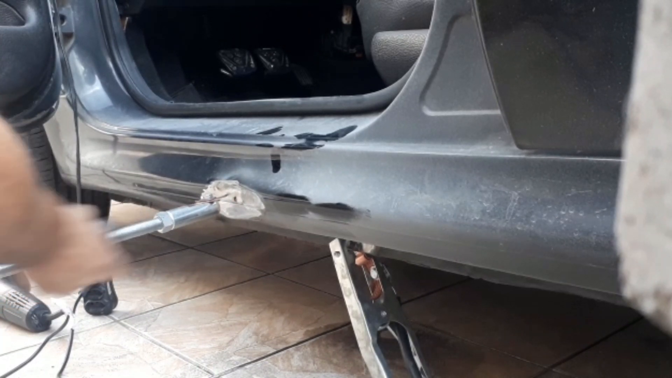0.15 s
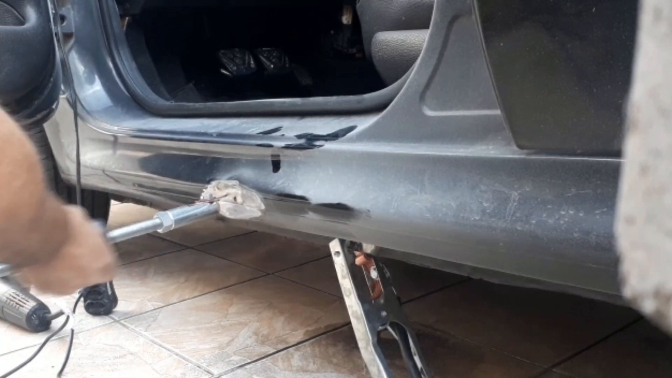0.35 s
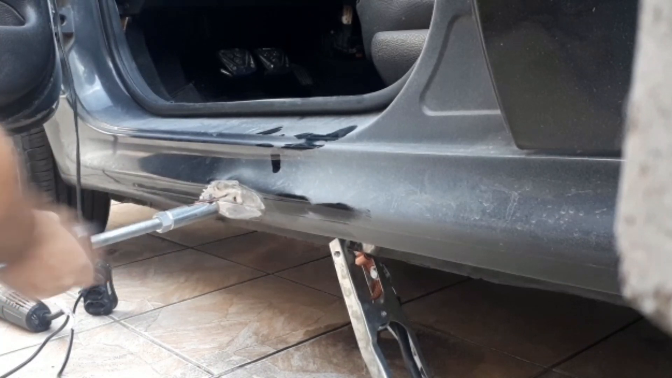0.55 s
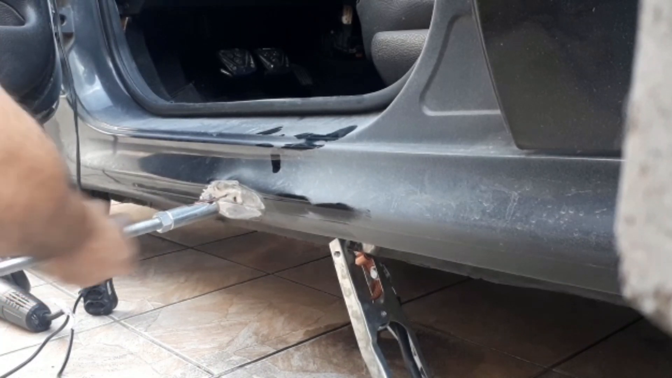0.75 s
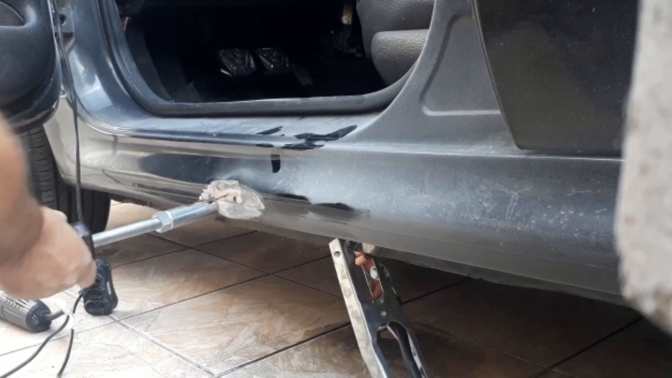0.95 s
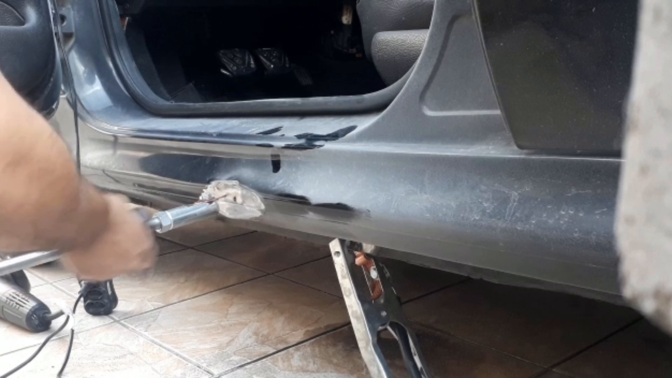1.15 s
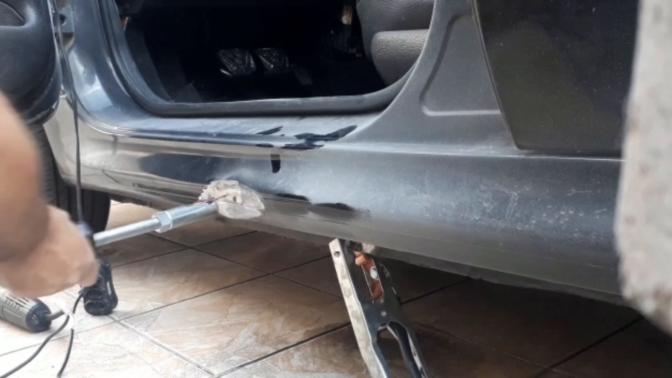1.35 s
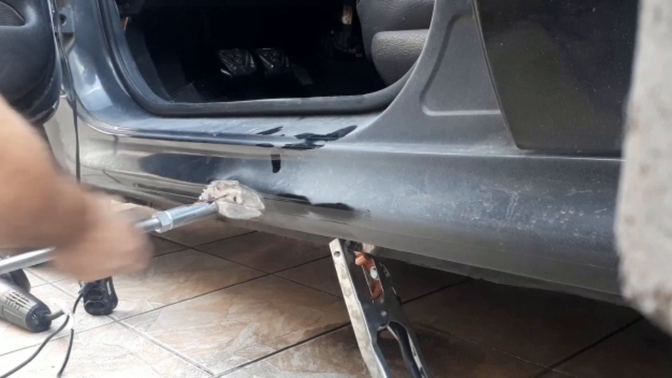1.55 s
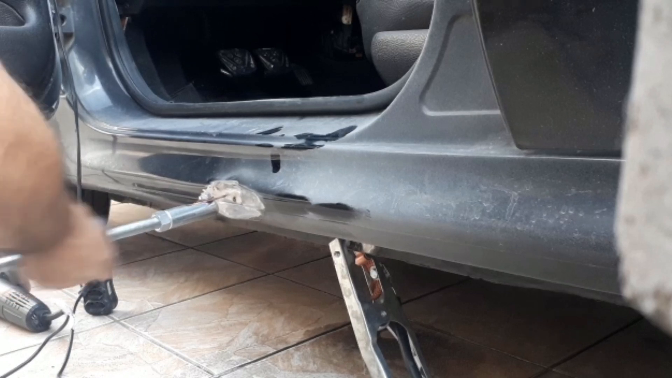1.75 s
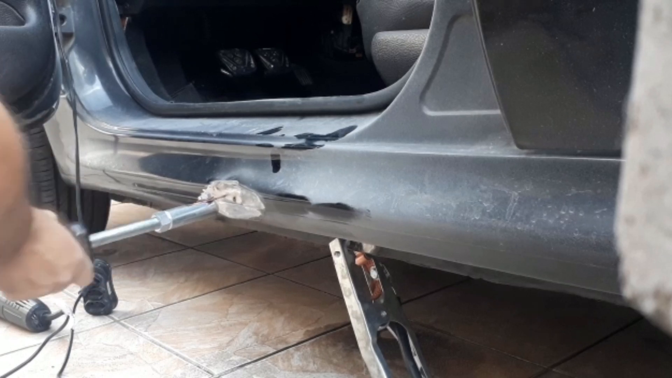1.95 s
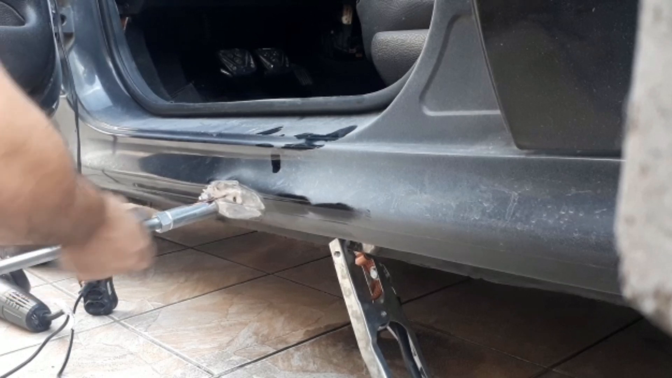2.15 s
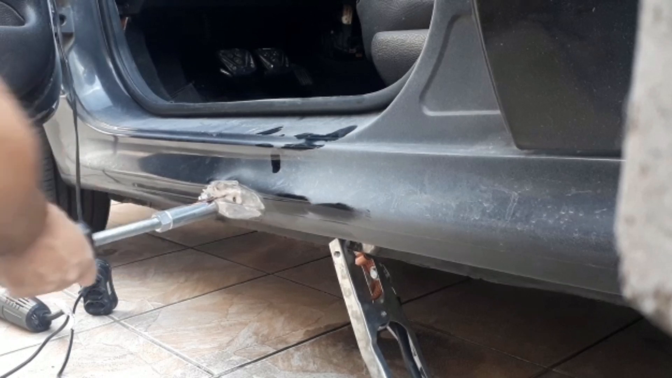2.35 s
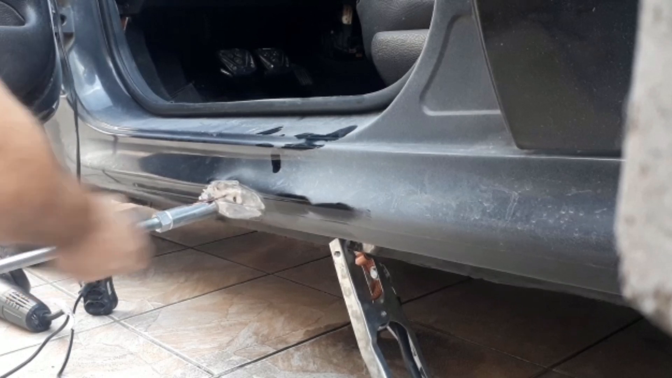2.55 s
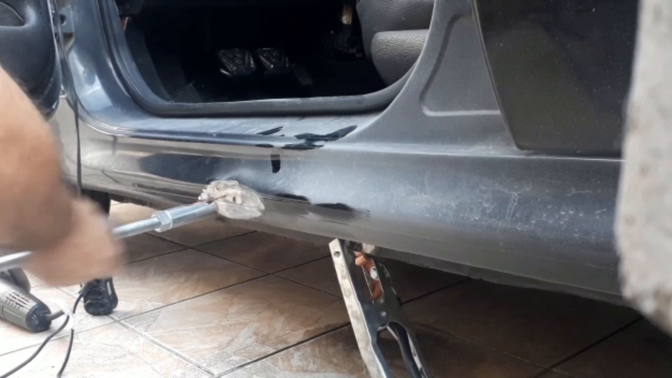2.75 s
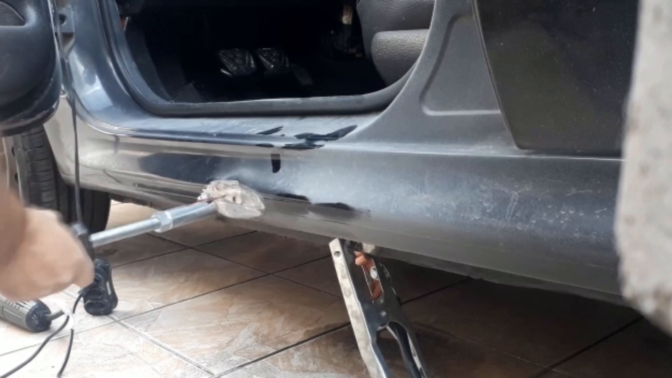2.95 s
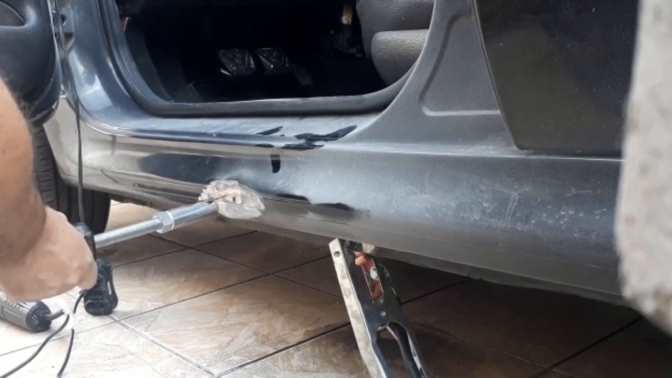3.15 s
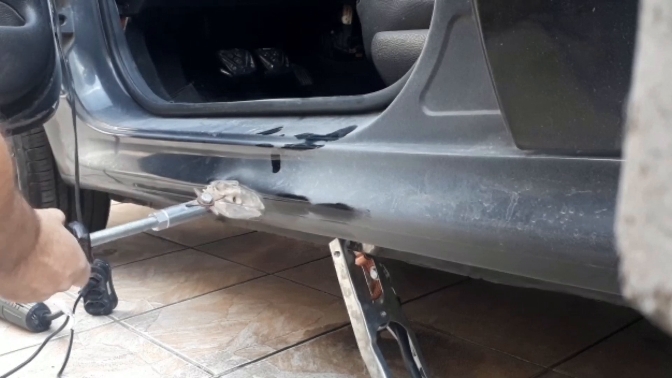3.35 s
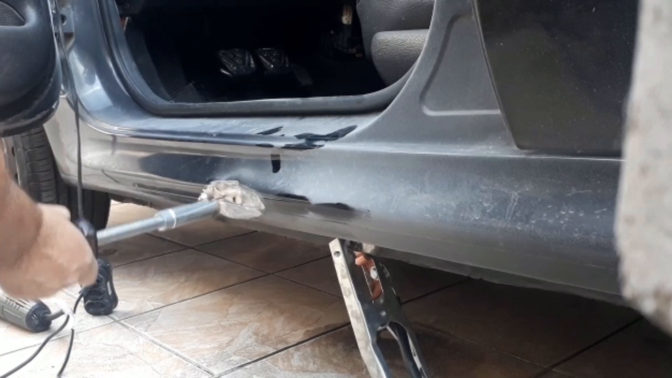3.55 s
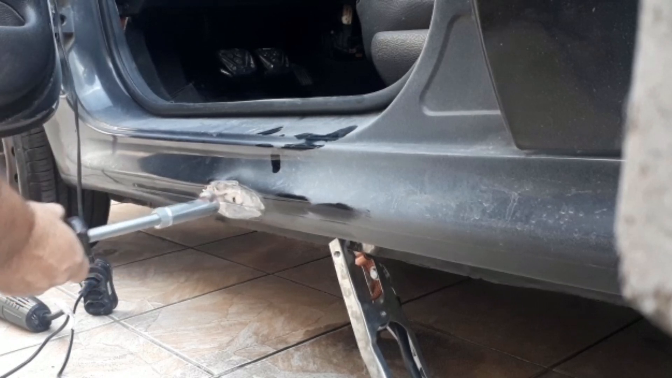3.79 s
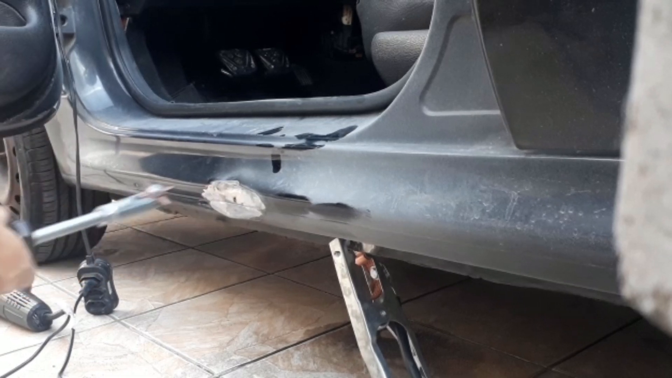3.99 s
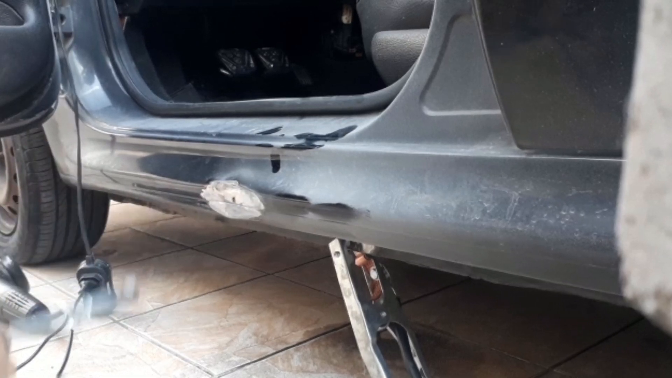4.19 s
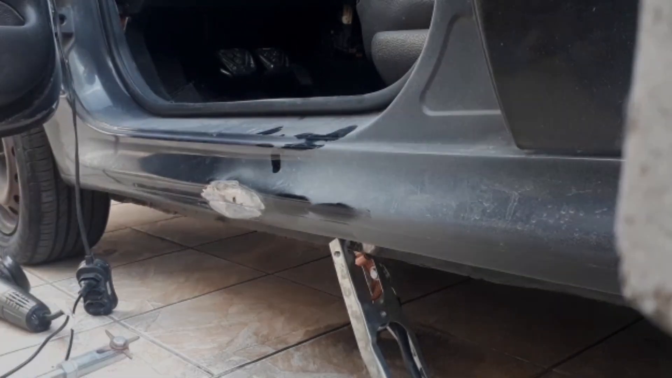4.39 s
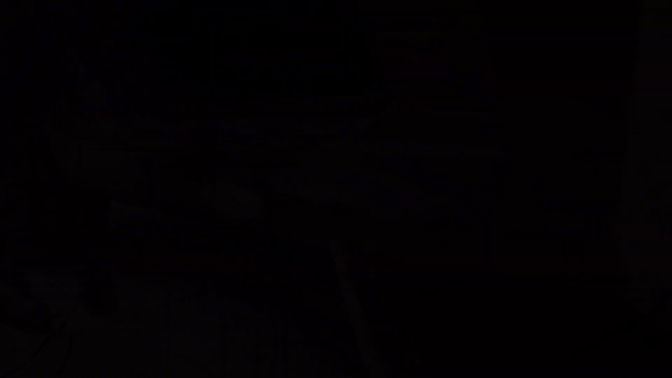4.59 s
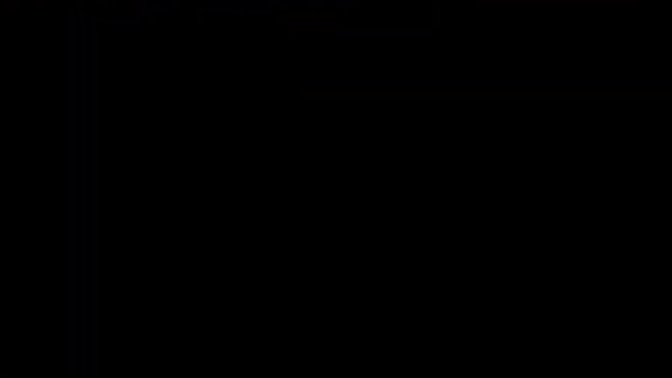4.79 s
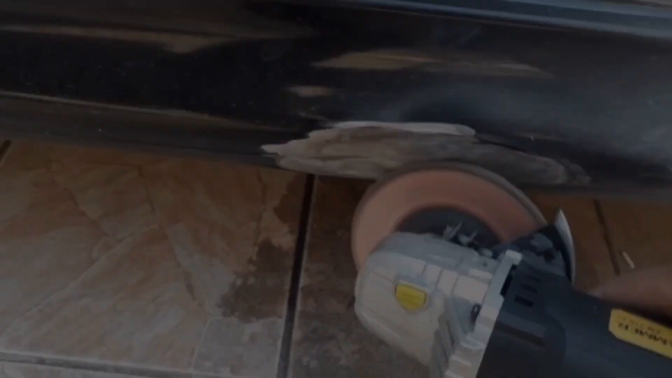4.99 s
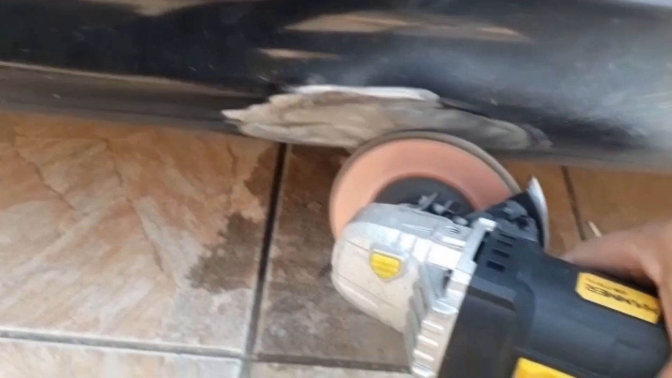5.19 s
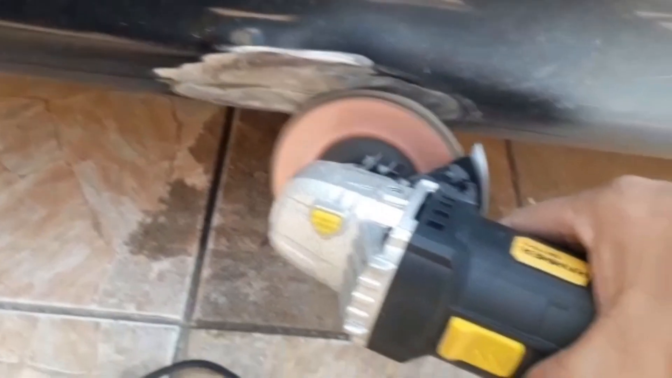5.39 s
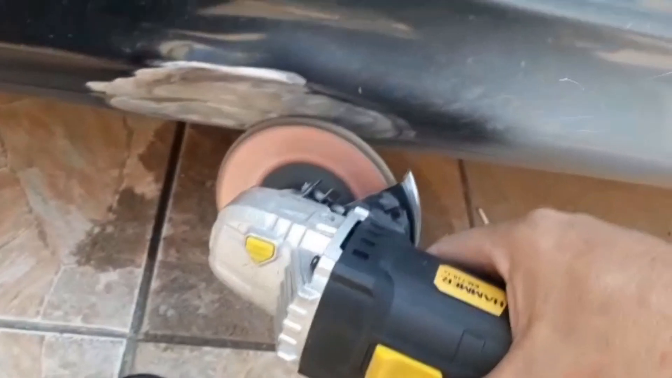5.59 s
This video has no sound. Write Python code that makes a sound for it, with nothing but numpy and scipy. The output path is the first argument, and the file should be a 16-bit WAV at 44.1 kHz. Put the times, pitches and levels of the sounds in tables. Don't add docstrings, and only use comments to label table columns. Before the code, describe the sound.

A slide hammer bangs nine times on a steel car sill with metallic scraping between, then knocks, brief silence, and an angle grinder fades in whining.

```python
import sys
import numpy as np
from scipy import signal
from scipy.io import wavfile

SR = 44100
rng = np.random.default_rng(int(sys.argv[2]) if len(sys.argv) > 2 else 0)


def ratio_of_db(decibels):
    return 10 ** (np.asarray(decibels, float) / 20)


def wav_out(sig):
    wavfile.write(sys.argv[1], SR, np.round(np.clip(np.atleast_2d(sig).T, -1, 1) * 32767).astype(np.int16))


N = 248283
TIME = np.arange(N) / SR

# (frequency [Hz], level [dB per Hz])
YARD_SPECTRUM = [(30, -27.5), (50, -16.5), (140, -4.5), (400, -12), (616, -6), (1300, -14.5), (2200, -27.5),
                 (16000, -43.5)]
BLOW_SPECTRUM = [(29, -60.5), (50, -26.5), (171, -2.5), (601, -1), (694, -5.5), (1210, -1), (1330, -20.5),
                 (1540, 1), (2880, -16), (4790, -18), (6090, -24), (8540, -29), (16000, -34)]
TAP_SPECTRUM = [(59, -37), (100, -16), (801, 5.5), (1550, 9.5), (2080, 1), (2420, 4.5), (3320, -50.5),
                (3940, -26), (7940, -13), (8640, -64.5), (9820, -48), (11900, -40), (16000, -53.5)]
KNOCK_SPECTRUM = [(59, -59), (100, -5), (328, -2.5), (1150, -5), (1720, -8), (1910, -1.5), (2270, -6.5),
                  (3250, -12.5), (3860, -8), (8640, -24.5), (16000, -44)]
FAN_SPECTRUM = [(24, -52), (70, -42), (167, -18), (444, -35), (510, 5), (585, -15), (646, 0), (1300, -1),
                (2050, 2.5), (3650, 3), (5180, -3), (6170, 1), (9690, -6), (12100, -6.5), (16000, -15)]

# (frequency [Hz], decay time T60 [s])
PANEL_T60 = [(50, 0.16), (130, 0.28), (400, 0.25), (1200, 0.24), (3000, 0.21), (7000, 0.15), (14000, 0.091)]
# (frequency [Hz], level [dB], decay time T60 [s])
SILL_MODES = [(62.4, -23.5, 0.27), (132.6, -20.5, 0.42), (218.2, -3, 0.3), (252.9, 3, 0.18),
              (296.7, 0.5, 0.16), (332.6, -3, 0.1), (374.8, -2.5, 0.23), (520, -12.5, 0.52),
              (611, -8, 0.35), (775, -3.5, 0.22), (889, -2.5, 0.083), (968, -9.5, 0.13), (1155, -9, 0.068),
              (1175, 4, 0.067), (1384, -4, 0.099), (1364, -7, 0.34), (1538, -3, 0.22), (1686, -12, 0.36),
              (2123, -2.5, 0.11)]
# (frequency [Hz], width [Hz], level [dB], decay time T60 [s])
ROD_CLUSTERS = [(1450, 160, -6, .12), (1690, 90, -8, .16), (2400, 220, -1, .08), (2750, 250, -5, .06),
                (3650, 110, -11, .2), (3950, 180, -8, .12), (4750, 200, -1, .12), (5250, 300, -5, .08),
                (8700, 330, -5, .17), (12000, 400, -20, .1)]
DRAG_DB = [3, 5, -1, -7, -8, -4, -18, -15, -21, -22]
# (frequency [Hz], level [dB], decay time T60 [s])
FREE_ROD_MODES = [(1470, -2, 0.066), (2285, 5, 0.039), (3570, -13, 0.15), (3750, -2.5, 0.094),
                  (4300, -21, .04), (5730, -7, .03), (7200, -14, .036), (8400, -12, .054)]
# (frequency [Hz], width [Hz])
HAMMER_DIPS = [(700, 70), (2050, 260)]
# (frequency [Hz], level [dB])
HUM_TONES = [(58.7, -74.5), (117.4, -67.5), (176, -68)]

# (time [s], peak [dB], brightness [dB],
# drag of the push that ends [dB], drag of the pull that starts [dB])
TURNS = [(0.087, -38, -22.5, -33, -38), (0.429, -13.5, -7.5, -30, -30.5), (0.792, -13, -10, -34, -39.5),
         (1.165, -13.5, -14, -32, -40), (1.489, -12.5, -.6, -31.5, -41.5), (1.83, -18, -28, -27.5, -38.5),
         (2.16, -14, -25, -28.5, -37.5), (2.481, -13, -2.5, -28.5, -30.5), (2.815, -15, -4, -34.5, -38.5)]
# (time [s], peak [dB], boom [dB], decay factor [1], clank [Hz])
BLOWS = [(0.197, -0.5, 4, 0.97, 2080), (0.568, -2, 6, 0.83, 2305), (0.918, -1.5, 4.5, 0.85, 2170),
         (1.285, -2.5, 4, 0.96, 2350), (1.623, -1, 1.5, 0.99, 2335), (1.957, -3, 3, 1, 2500),
         (2.291, -0.5, 1, 0.96, 2300), (2.624, -2.5, 2, 0.9, 2360), (2.951, -1, 3, 0.83, 2270)]
# (time [s], peak [dB], decay factor [1])
SLACKS = [(0.161, -20, 3.4), (0.542, -8, 2.3), (0.886, -11, 1.83), (1.254, -11, 2.37), (1.597, -10, 0.73),
          (1.929, -9.5, 1.1), (2.261, -11, 1.1), (2.59, -13, 2.1), (2.92, -13, 1.3)]
# (time [s], peak [dB], decay factor [1])
BOUNCES = [(0.28, -9.5, .6), (0.638, -11.5, .35), (0.989, -32.5, 1.5), (1.349, -17, .35), (1.691, -15, .4),
           (2.017, -13.5, .35), (2.358, -16, .49), (2.689, -26.5, .35)]
# (time [s], peak [dB], decay factor [1], brightness [dB])
RATTLES = [(0.7, -25, 2.5, -44), (0.861, -22.5, .41, -16), (1.22, -22.5, 2.2, -19.5),
           (1.561, -21, 1.01, -8.5), (1.579, -17, .35, -20), (2.22, -22, .77, -15.5),
           (2.518, -8, .97, -8.5), (2.879, -29.5, 2.9, -15.5)]
# (time [s], peak [dB], boom [dB], brightness [dB], clank [Hz])
KNOCKS = [
    (3.28, -33.5, 7, -57, 1453),
    (3.322, -25.5, 3.5, -66, 2310),
    (3.483, -18.5, 4, -28, 1710),
    (3.517, -56, 15, -36, 520),
    (3.581, -37.5, 13, -54, 1650),
    (3.734, -32, 8, -28, 1080),
    (3.753, -7, 3.5, -24, 1323),
    (3.812, -20.5, -5, 3.5, 3770),
    (3.841, -20.5, 14, -18, 770),
    (3.996, -22, -42, 6.5, 2220),
]
# (time [s], peak [dB])
CLINKS = [
    (3.322, -60),
    (3.483, -46.5),
    (3.812, -35),
    (3.995, -35),
]
# (time [s], frequency [Hz], level [dB], decay time T60 [s])
PATCH_RINGS = [
    (3.517, 520, -36.5, 0.19),
    (3.585, 630, -48, 0.3),
    (3.33, 1130, -41, 0.14),
]
# (time [s], frequency [Hz], level [dB])
SQUEAK = [
    (3.655, 4600, -75),
    (3.67, 4600, -69),
    (3.69, 4481, -56),
    (3.70, 3700, -56),
    (3.725, 3500, -56),
    (3.735, 3102, -59),
    (3.75, 2900, -70),
]
# (time [s], peak [dB], boom [dB], brightness [dB], decay factor [1], clank [Hz])
SET_DOWN = [
    (4.319, -17, -5.5, 2.5, 1.6, 2270),
]

# (time [s], armature order 12 [Hz], whine re hiss [dB])
LOAD = [
    (4.81, 6119, -15),
    (4.91, 6122, -15),
    (5.06, 6111, -13),
    (5.268, 6109, -7.5),
    (5.448, 6107, -6.5),
    (5.492, 6105, -23),
    (5.53, 6109, -20),
    (5.63, 6114, -21),
]
# (frequency [Hz], width [Hz], level [dB])
HOUSING = [(1300, 200, -12), (3050, 350, -11), (3630, 130, -8), (4100, 450, -8), (6300, 400, -12),
           (8850, 500, -8)]
# (multiple of rotation [1], level re hiss [dB])
ARMATURE = [(1, -21), (9, -36.5), (10, -21.5), (23, -16.5), (25, -28.5)]
# (multiple of rotation [1], level re hiss [dB])
SPINDLE = [(4, -27), (6, -29.5), (8, -28.5), (9, -22), (10, -24), (11, -23.5), (12, -46), (16, -32),
           (22, -17.5), (54, -17)]
# (time [s], peak [dB])
THUMPS = [
    (4.943, -30),
    (5.016, -26.5),
    (5.094, -20.5),
    (5.2, -38),
    (5.398, -23.5),
    (5.45, -22),
]

YARD_DB = -57
FADE_OUT_START_S, FADE_OUT_END_S, CUT_S = 4.213, 4.677, 4.662
FADE_IN_START_S, FADE_IN_END_S = 4.806, 5.23
PUSH_START_S, FASTEST_SHARE, SLOWING_DB, STILL_S = -0.032, 0.64, 4.5, 0.02
PULL_GAIN_DB, SETTLE_S, SETTLE_DB = 6, 0.14, -52
SCRAPE_DB, JOLT_DB, JOLT_S = -14, -34, 0.09
BULGE_S, BULGE_DB = 0.0107, 2.5
BLOW_BRIGHT_DB = 6
TURN_BOOM_DB, TURN_RING, TURN_HZ = 6.5, 0.63, 2430
SLACK_BOOM_DB, SLACK_BRIGHT_DB, SLACK_HZ = -1, -4, 2420
BOUNCE_BOOM_DB, BOUNCE_BRIGHT_DB, BOUNCE_HZ = 4, -1.5, 2300
RATTLE_BOOM_DB, RATTLE_HZ = 11, 2400
KNOCK_RING, HEAVY_RING = 0.75, 1.46
SPINDLE_HZ, HISS_DB, TREBLE_TILT_DB = 165.3, -21, 3.0
SECOND_FOLLOWS, SECOND_DB = 0.6, -2.5


def rms_one(x):
    return x / np.sqrt(np.mean(x ** 2) + 1e-20)


def in_time(rows):
    s, *columns = np.transpose(rows)
    span = (TIME >= s[0]) & (TIME <= s[-1])
    return [np.interp(TIME, s, column) for column in columns] + [span]


def at_hz(points, hz):
    table = np.array(points)
    return np.interp(np.log(hz), np.log(table[:, 0]), table[:, 1])


def high_pass(x, hz, order=2):
    return signal.sosfilt(signal.butter(order, hz, "high", fs=SR, output="sos"), x)


def drift(rate):
    r = np.exp(-80 * np.pi * rate / SR)
    coarse = rng.standard_normal(N // 40 + 2002)
    slow = signal.lfilter([1], [1, -2 * r, r * r], coarse)[2000:]
    return np.interp(np.arange(N) / 40, np.arange(len(slow)), rms_one(slow))


def ring(clicks, hz, t60):
    r, w = ratio_of_db(-60 / (t60 * SR)), 2 * np.pi * hz / SR
    return signal.lfilter([0, np.sin(w)], [1, -2 * r * np.cos(w), r * r], clicks + 1e-18)


def noise_bank():
    edges = 32 * 2 ** np.arange(0, 9.1, 1 / 3)
    white = rng.standard_normal((2, N))
    bank = []
    for k, (low, high) in enumerate(zip(edges, edges[1:])):
        band_pass = signal.butter(2, [low, high], "band", fs=SR, output="sos")
        bank.append((np.sqrt(low * high), signal.sosfilt(band_pass, white[k % 2])))
    return bank


def coloured(bank, spectrum, patchy_db, tilt_db=0):
    out = np.zeros(N)
    for hz, band in bank:
        level_db = at_hz(spectrum, hz) + patchy_db * drift(20) + tilt_db * np.log2(hz / 4000)
        out += ratio_of_db(level_db) * band
    return out


def clusters():
    out = []
    for hz, width, _, _ in ROD_CLUSTERS:
        once = ring(rng.standard_normal(N), hz, 1.4 / width)
        out.append(rms_one(ring(once, hz, 1.4 / width)))
    return out


def yard(bank):
    return ratio_of_db(YARD_DB) * rms_one(coloured(bank, YARD_SPECTRUM, patchy_db=3.2))


def hum():
    out = np.zeros(N)
    for hz, db in HUM_TONES:
        level = np.sqrt(2) * ratio_of_db(db + 3.7 * drift(3.3))
        out += level * np.sin(2 * np.pi * hz * TIME + 0.42 * drift(5))
    return out


def strokes():
    starts = [PUSH_START_S] + [blow[0] for blow in BLOWS]
    rows = []
    for start, end, (turn, _, _, push_db, pull_db) in zip(starts, starts[1:], TURNS):
        rows += [(start + FASTEST_SHARE * (turn - start), push_db),
                 (turn - STILL_S, push_db - SLOWING_DB),
                 (turn + STILL_S, pull_db),
                 (end, pull_db + PULL_GAIN_DB)]
    settled = starts[-1] + SETTLE_S
    drag_db, _ = in_time(rows + [(settled, SETTLE_DB)])
    jolt = sum((TIME > s) * ratio_of_db(JOLT_DB - 20 * np.abs(TIME - s) / JOLT_S) for s in starts)
    return ratio_of_db(drag_db + SCRAPE_DB) + jolt, ratio_of_db(drag_db), TIME <= settled


def sliding(bank, rod):
    scrape, rumble, on = strokes()
    happens = rng.random(N) < 900 / SR
    grain_level = ratio_of_db(3.5 * np.minimum(rng.exponential(1, N), 4))
    grains = happens * grain_level * rng.choice([-1, 1], N)
    rattle = np.zeros(N)
    for (_, _, db, _), band, drag_db in zip(ROD_CLUSTERS, rod, DRAG_DB):
        rattle += ratio_of_db(db + drag_db + 5.5 * drift(12)) * band
    wash = rms_one(coloured(bank, TAP_SPECTRUM, patchy_db=2.0))
    panel = rms_one(sum(ratio_of_db(0.6 * db) * ring(grains, hz, 0.45 * t60) for hz, db, t60 in SILL_MODES[3:]))
    return on * (scrape * (0.9 * rms_one(rattle) + 0.45 * wash) + rumble * ratio_of_db(-5) * panel)


def clank(contact, hz, t60, bright_db):
    age = np.arange(len(contact)) / SR
    partials = ring(contact, hz, t60) + 0.6 * ring(contact, 1.22 * hz, t60)
    partials += 0.4 * ratio_of_db(min(bright_db, 0)) * ring(contact, 2.05 * hz, t60)
    return partials * (1 - np.exp(-age / 0.0006))


def struck(bank, rod, hits, colour, dense_db, sill_db, rod_db, clank_db, clank_s, quick, late_cycles):
    out, age = np.zeros(N), np.arange(SR // 2) / SR
    spread = rng.normal(0, 1, (len(hits), len(SILL_MODES) + len(ROD_CLUSTERS)))
    chatter = rng.standard_normal((len(hits), len(age))) * ratio_of_db(-60 * age / 0.0087)
    chatter = chatter / np.sqrt(np.sum(chatter ** 2, axis=1, keepdims=True))
    contact = (age == 0) + 0.45 * (np.round(age * SR) == round(0.0065 * SR))
    snap = -np.exp(-((age - BULGE_S) / 0.0006) ** 2) / (0.001 * SR)
    snap = ratio_of_db(BULGE_DB) * high_pass(snap, 150)

    def swell(hz):
        return (1 - np.exp(-age / (late_cycles / hz + 0.0003))) ** 2

    for (s, peak_db, boom_db, bright_db, factor, clank_hz), push, luck in zip(hits, chatter, spread):
        def tone_db(hz):
            return np.interp(np.log(hz), np.log([300, 900, 2500, 8000]), [boom_db, 0, 0, bright_db])

        start = round(s * SR)
        now = slice(start, start + len(age))
        panel_factor = quick * np.clip(factor, 0.3, 3)
        rod_factor = np.clip(factor, 0.5, 3)
        sound = ratio_of_db(clank_db) * clank(contact, clank_hz, clank_s, bright_db)
        for hz, band in bank:
            decay_db = 60 * age / (at_hz(PANEL_T60, hz) * panel_factor)
            level = ratio_of_db(dense_db + tone_db(hz) + at_hz(colour, hz) - decay_db)
            sound += level * swell(hz) * band[now]
        for (hz, level_db, t60), odd in zip(SILL_MODES, luck):
            level = ratio_of_db(sill_db + level_db + tone_db(hz) + 2.5 * odd)
            kick = snap if hz < 450 else contact * np.sign(odd)
            mode = ring(0.5 * push + kick, hz * (1 + 0.006 * odd), t60 * panel_factor)
            sound += level * np.sqrt(swell(3 * hz)) * mode
        for (hz, _, level_db, t60), band, odd in zip(ROD_CLUSTERS, rod, luck[::-1]):
            near_db = (10 - tone_db(hz)) * (abs(hz / clank_hz - 1) < 0.06)
            decay_db = 60 * age / (t60 * rod_factor)
            level = ratio_of_db(rod_db + level_db + near_db + tone_db(hz) + 2.5 * odd - decay_db)
            sound += level * swell(hz) * band[now]
        out[now] += ratio_of_db(peak_db) * sound * np.minimum(1, (age[-1] - age) / 0.1)
    return out


def taps(bank, rod):
    hits = [(s, db, TURN_BOOM_DB, bright, TURN_RING, TURN_HZ) for s, db, bright, _, _ in TURNS]
    hits += [(s, db, SLACK_BOOM_DB, SLACK_BRIGHT_DB, factor, SLACK_HZ) for s, db, factor in SLACKS]
    hits += [(s, db, BOUNCE_BOOM_DB, BOUNCE_BRIGHT_DB, factor, BOUNCE_HZ) for s, db, factor in BOUNCES]
    hits += [(s, db, RATTLE_BOOM_DB, bright, factor, RATTLE_HZ) for s, db, factor, bright in RATTLES]
    return struck(bank, rod, hits, TAP_SPECTRUM, dense_db=-8, sill_db=-34.5, rod_db=-26,
                  clank_db=-9, clank_s=0.02, quick=1.0, late_cycles=0.94)


def blows(bank, rod):
    hits = [(s, db, boom, BLOW_BRIGHT_DB, factor, hz) for s, db, boom, factor, hz in BLOWS]
    return struck(bank, rod, hits, BLOW_SPECTRUM, dense_db=3.0, sill_db=-20, rod_db=-23.5,
                  clank_db=2, clank_s=0.009, quick=1.338, late_cycles=1.8)


def knocks(bank, rod):
    hits = []
    for s, db, boom, bright, hz in KNOCKS:
        factor = HEAVY_RING if boom > 10 else KNOCK_RING
        hits.append((s, db, boom, bright, factor, hz))
    return struck(bank, rod, hits, KNOCK_SPECTRUM, dense_db=-4, sill_db=-25.5, rod_db=-24.5,
                  clank_db=-9.5, clank_s=0.024, quick=1.0, late_cycles=1.0)


def loose_tool():
    out = np.zeros(N)
    times, peaks_db = np.transpose(CLINKS)
    luck = rng.normal(0, 1, (len(CLINKS), len(FREE_ROD_MODES)))
    for (hz, level_db, t60), odd in zip(FREE_ROD_MODES, luck.T):
        clicks = np.zeros(N)
        clicks[[round(s * SR) for s in times]] = ratio_of_db(peaks_db + level_db + 2.0 * odd)
        out += ring(clicks, hz, t60)
    for s, hz, db, t60 in PATCH_RINGS:
        click = np.zeros(N)
        click[round(s * SR)] = 1
        out += ratio_of_db(db) * ring(click, hz, t60)
    return out


def squeak():
    hz, db, on = in_time(SQUEAK)
    phase = 2 * np.pi * np.cumsum(hz * (1 + 0.018 * drift(142))) / SR
    return on * ratio_of_db(db) * drift(92) * np.sin(phase)


def set_down(bank, rod):
    return struck(bank, rod, SET_DOWN, KNOCK_SPECTRUM, dense_db=0.5, sill_db=-34, rod_db=-38,
                  clank_db=-11, clank_s=0.041, quick=0.82, late_cycles=1.0)


def band_dips(x, depth):
    for hz, width in HAMMER_DIPS:
        x = x - depth * signal.lfilter(*signal.iirpeak(hz, hz / width, fs=SR), x)
    return x


def fan_hiss(bank, spindle):
    hiss = coloured(bank, FAN_SPECTRUM, patchy_db=0.0, tilt_db=TREBLE_TILT_DB)
    hiss = 0.85 * hiss / np.std(hiss[-SR // 2:])
    white = rng.standard_normal(N)
    for hz, width, db in HOUSING:
        hiss += ratio_of_db(db - 6 + 2.5 * drift(25)) * rms_one(ring(white, hz, 2.2 / width))
    return hiss * (1 + 0.099 * np.sin(spindle)) * ratio_of_db(0.99 * drift(49.72))


def grinder(bank):
    bar_hz, first_db, _ = in_time(LOAD)
    second_db = SECOND_DB + SECOND_FOLLOWS * first_db
    turn = 2 * np.pi * np.cumsum(bar_hz / 12) / SR
    spindle = 2 * np.pi * SPINDLE_HZ * TIME
    lines = [(k * turn, db) for k, db in ARMATURE] + [(k * spindle, db) for k, db in SPINDLE]
    tones = np.zeros(N)
    for phase, db in lines:
        tones += ratio_of_db(db + 2.0 * drift(15)) * np.sin(phase + 0.3 * drift(15))
    tones += ratio_of_db(first_db + 1.1 * drift(39)) * np.sin(12 * turn)
    tones += ratio_of_db(second_db + 1.46 * drift(40)) * np.sin(24 * turn)
    fade = np.clip((TIME - FADE_IN_START_S) / (FADE_IN_END_S - FADE_IN_START_S), 0, 1)
    return fade * ratio_of_db(HISS_DB) * (fan_hiss(bank, spindle) + np.sqrt(2) * tones)


def thumps():
    clicks = np.zeros(N)
    for k, (s, db) in enumerate(THUMPS):
        sign = 1 if k in (1, 2) else -1
        clicks[round(s * SR)] = sign * ratio_of_db(db + 6)
    return ring(clicks, 185, 0.0094) + 0.96 * ring(clicks, 560, 0.0044)


def scene():
    bank, other, rod = noise_bank(), noise_bank(), clusters()
    hammer = sliding(other, rod) + taps(other, rod) + blows(bank, rod)
    hammer += knocks(bank, rod) + set_down(other, rod)
    hammer = band_dips(hammer, depth=0.7)
    hammer += yard(bank) + hum() + loose_tool() + squeak()
    fade = np.clip((FADE_OUT_END_S - TIME) / (FADE_OUT_END_S - FADE_OUT_START_S), 0, 1)
    fade = fade * (TIME < CUT_S)
    grinding = high_pass(grinder(other) + thumps(), 85)
    return np.tile(fade * hammer + grinding, (2, 1))


def roll_off(x):
    return signal.sosfilt(signal.butter(12, 16970, fs=SR, output="sos"), x)


def record(dry):
    limited = np.clip(high_pass(dry, 46, order=6), -0.92, 0.92)
    top_cut = signal.ellip(12, 0.5, 45, 15750, fs=SR, output="sos")
    mix = signal.sosfilt(top_cut, limited)
    return roll_off(mix)


dry = scene()
out = record(dry)
wav_out(out)
```